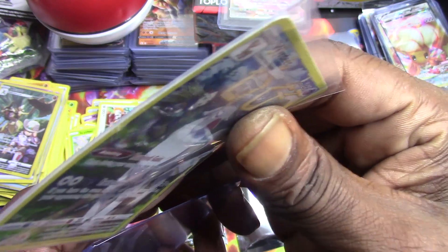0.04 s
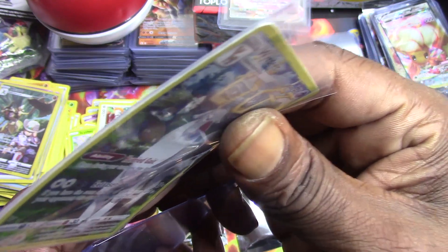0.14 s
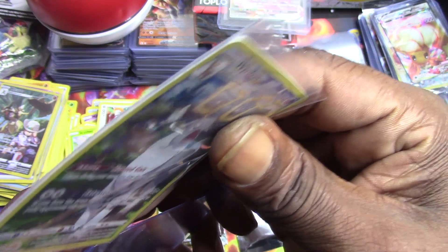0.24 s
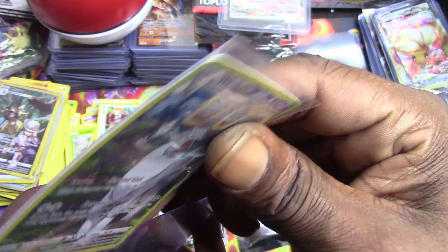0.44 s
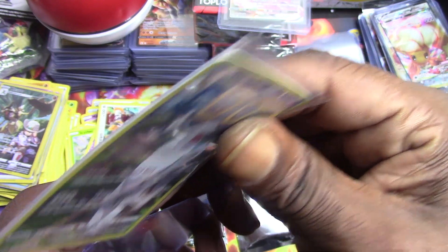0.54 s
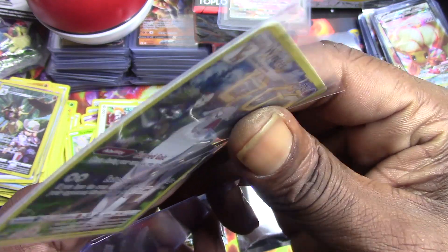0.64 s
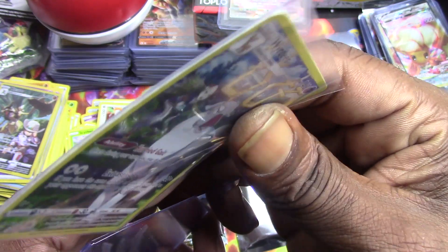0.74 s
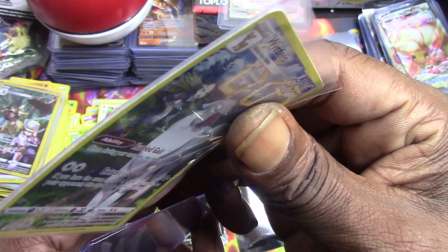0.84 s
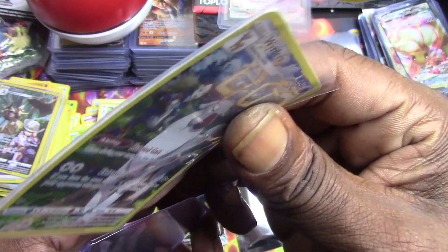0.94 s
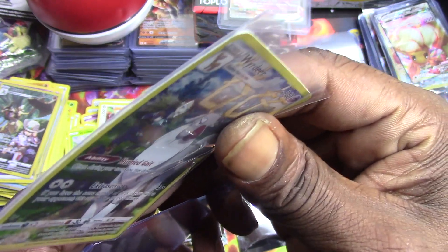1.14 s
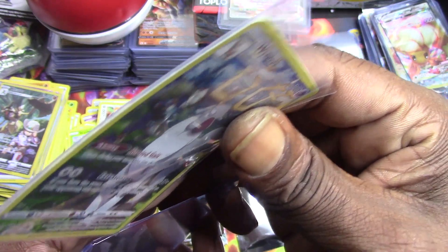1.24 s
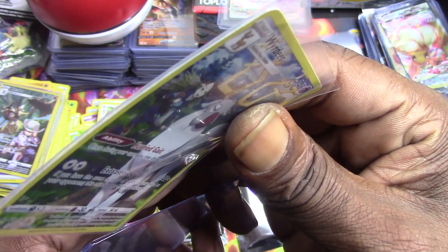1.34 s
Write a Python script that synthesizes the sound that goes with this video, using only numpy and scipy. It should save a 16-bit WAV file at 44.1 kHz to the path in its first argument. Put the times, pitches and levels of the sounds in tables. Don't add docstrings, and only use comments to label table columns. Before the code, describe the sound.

A thin plastic card sleeve gives one sharp, bright snap close to the microphone, with a short faint room tail, then soft sliding rustles and tiny ticks over steady low ventilation noise indoors.

```python
import sys
import numpy as np
from scipy import signal
from scipy.fft import rfft, irfft
from scipy.io import wavfile
from scipy.ndimage import uniform_filter1d

SR = 44100
rng = np.random.default_rng(int(sys.argv[2]) if len(sys.argv) > 2 else 0)


def unload_wav(signal):
    wavfile.write(
        sys.argv[1],
        SR,
        np.round(np.clip(np.atleast_2d(signal).T, -1, 1) * 32767).astype(np.int16),
    )


def nominal_scale(level):
    x = np.asarray(level, float) / 20
    return 10 ** x


N = 61739
SNAP_S, SNAP_DB = .22274, -6


def read(points, hz):
    f, value = np.transpose(points)
    return np.interp(np.log(hz + 1), np.log(f + 1), value)


def evened(x):
    return x / np.sqrt(np.mean(x ** 2) + 1e-20)


def add(mix, s, sound):
    part = mix[..., round(s * SR):][..., :sound.shape[-1]]
    part += sound[..., :part.shape[-1]]


def colour(x, gain_db):
    hz = np.fft.rfftfreq(x.shape[-1], 1 / SR)
    return irfft(rfft(x) * nominal_scale(gain_db(hz)), x.shape[-1])


def below(x, edge_hz):
    return colour(x, lambda hz: -np.clip((hz - edge_hz) / 8, 0, 100))


def spread(wide_db):
    mid, side = rng.standard_normal((2, N))
    side = nominal_scale(wide_db) * side
    return np.array([mid + side, mid - side])


def bumps(t, events):
    return [(np.exp(-((t - s) / half) ** 2), db) for s, half, db in events]


def wave(delay_ms, hz, length_ms, db):
    t = np.arange(400) / SR - delay_ms / 1000
    swell = np.sin(np.pi * np.clip(t * 1000 / length_ms, 0, 1)) ** 2
    return nominal_scale(db) * swell * np.sin(2 * np.pi * hz * t)


def snap():
    # (delay [ms], frequency [Hz], length [ms], level [dB])
    bending_waves = [(0, 9685, .603, -2.1), (.075, 13725, .55, -5.4), (.129, 7000, .532, -2),
                     (.24, 4731, .791, -.1), (.806, 5919, 1.63, -21), (.313, 11149, 1.28, -11.3),
                     (.662, 5400, 1.035, -5.1), (.63, 7380, .718, -5.5), (.582, 11843, 1.5, -19),
                     (.5, 1630, 3.6, -25), (.6, 610, 4.5, -24)]
    left_high_db, left_from_hz, right_late_ms = 3, 11500, .004
    out = np.zeros((2, N))
    for delay_ms, hz, length_ms, db in bending_waves:
        lean = left_high_db / 2 / (1 + (left_from_hz / hz) ** 8)
        left = wave(delay_ms, hz, length_ms, SNAP_DB + db + lean)
        right = wave(delay_ms + right_late_ms, hz, length_ms, SNAP_DB + db - lean)
        add(out, SNAP_S, np.array([left, right]))
    return out


def near_scatter():
    # (frequency [Hz], level [dB])
    scatter_tone = [(350, -35.5), (600, 1), (4120, 0), (7490, -5.5), (9340, -9), (14200, -9.5),
                    (16500, -28)]
    start_s, rise_s, level_db, t60_s = .0011, .00073, -18.5, .02
    t = np.arange(N) / SR - SNAP_S
    blur = evened(colour(spread(-14.5), lambda hz: read(scatter_tone, hz)))
    rise = np.clip((t - start_s) / rise_s, 0, 1)
    fall = nominal_scale(level_db - 60 * np.maximum(t, 0) / t60_s)
    return nominal_scale(SNAP_DB) * blur * rise * fall


def wall_echoes():
    # (frequency [Hz], level [dB])
    wall_tone = [(1470, -39.5), (2500, -7.5), (3220, -9), (5130, -2), (10300, -14.5), (15100, -20),
                 (16000, -24), (16500, -54.5)]
    # (frequency [Hz], time [s])
    wall_t60 = [(2500, 0.28), (5000, .3), (9000, .27), (15000, .2)]
    # (delay [s], half length [s], lift [dB])
    first_walls = [
        (0.0133, .0025, 3.5),
        (0.031, .003, 3),
    ]
    level_db, start_s, build_s = -38, .006, .022
    t = np.arange(N) / SR - SNAP_S
    hz, s, z = signal.stft(spread(-14.5), SR, nperseg=256)
    fall_db = 60 * np.maximum(s - SNAP_S, 0) / read(wall_t60, hz)[:, None]
    z = z * nominal_scale(read(wall_tone, hz)[:, None] - fall_db)
    tail = signal.istft(z, SR, nperseg=256)[1][:, :N]
    tail = tail / np.sqrt(np.mean(tail[:, t < 0] ** 2))
    tail = tail * nominal_scale(sum(db * bump for bump, db in bumps(t, first_walls)))
    build = np.clip((t - start_s) / build_s, 0, 1) ** .5
    return nominal_scale(SNAP_DB + level_db) * tail * build


def ticks():
    # (time [s], level [dB], frequency of the ring [Hz], level of the ring [dB])
    creases = [
        (.1999, -42.5, 5900, 0),
        (.037, -60.5, 11000, 2),
        (.478, -62, 7000, -1),
        (.667, -55, 12000, -4),
        (.7365, -47, 11500, -7.5),
        (0.746, -60, 11500, -8),
        (1.005, -54, 9400, -7),
        (1.268, -52, 11500, -6),
        (1.2966, -45.5, 10100, -6),
    ]
    crack_ms, ring_ms = .3, 1.3
    shape = np.sin(np.pi * np.clip(np.arange(400) / SR * 1000 / crack_ms, 0, 1)) ** 4
    out = np.zeros(N)
    for s, db, hz, ring_db in creases:
        crack = np.roll(rng.standard_normal(400) * shape, 99)
        crack = colour(crack, lambda f: -6.0 * np.log2((f + 50) / 9000) ** 2)
        crack = np.roll(crack, -90)
        add(out, s, nominal_scale(db) * (crack / abs(crack).max() + wave(.15, hz, ring_ms, ring_db)))
    return out


def rustle():
    # (centre [s], half length [s], level [dB])
    slides = [
        (0.034, 0.045, -81),
        (0.484, 0.037, -68),
        (0.658, 0.068, -72.5),
        (.82, .04, -75),
    ]
    # (frequency [Hz], level [dB])
    rub_tone = [(2000, -20), (3500, -2), (7000, 1), (12000, -11), (16000, -25)]
    loudness = sum(nominal_scale(db) * bump for bump, db in bumps(np.arange(N) / SR, slides))
    grains = spread(-21) * nominal_scale(3.0 * rng.exponential(1, N))
    return loudness * evened(colour(grains, lambda hz: read(rub_tone, hz)))


def air():
    # (frequency [Hz], level [dB per Hz])
    air_tone = [(40, -40), (58, -14.5), (82, -3), (300, -6.5), (1000, -18.5), (2200, -26.5), (6000, -37.5),
                (15500, -49.5)]
    # (frequency [Hz], width [Hz], lift [dB])
    resonances = [(85, 16, 6.5), (198, 21, 1.5), (264, 5.1, 2), (328, 14, 5.5), (478.6, 20, 5),
                  (645, 23, 7), (781, 25, 6), (903, 28, 4)]
    # (time [s], level [dB])
    drift = [(0, 1), (.25, 1.5), (.6, .5), (.8, 0.3), (1.4, 0.5)]
    # (frequency [Hz], side minus mid [dB])
    air_side = [(60, -33), (180, -22.5), (550, -17), (1650, -11), (4970, -10), (15000, -14.5)]
    level_db = -47.5

    def tone(f):
        peaks = sum(db / (1 + (2 * (f - at) / w) ** 2) for at, w, db in resonances)
        return read(air_tone, f) + peaks

    a, b, c, d, patches = rng.standard_normal((N // 256 + 5, 513, 5)).T
    patches = uniform_filter1d(patches, size=10, axis=0)
    patches = evened(uniform_filter1d(patches, size=10, axis=1))
    spectra = np.array([a + 1j * b, c + 1j * d]) * nominal_scale(.8 * patches)
    mid, side = signal.istft(spectra, nperseg=1024, noverlap=768)[1][:, :N]
    mid = colour(mid, tone)
    side = colour(side, lambda f: tone(f) + read(air_side, f))
    gain = nominal_scale(level_db + np.interp(np.arange(N) / SR, *np.transpose(drift))) / np.std(mid)
    return gain * np.array([mid + side, mid - side])


def scene():
    quiet = near_scatter() + wall_echoes() + ticks() + rustle() + air()
    return below(snap(), 16800) + below(quiet, 15900)


def band_limit(x):
    return signal.sosfilt(signal.butter(12, 17150, fs=SR, output="sos"), x)


def record(dry):
    return band_limit(dry)


dry = scene()
out = record(dry)
unload_wav(out)
```